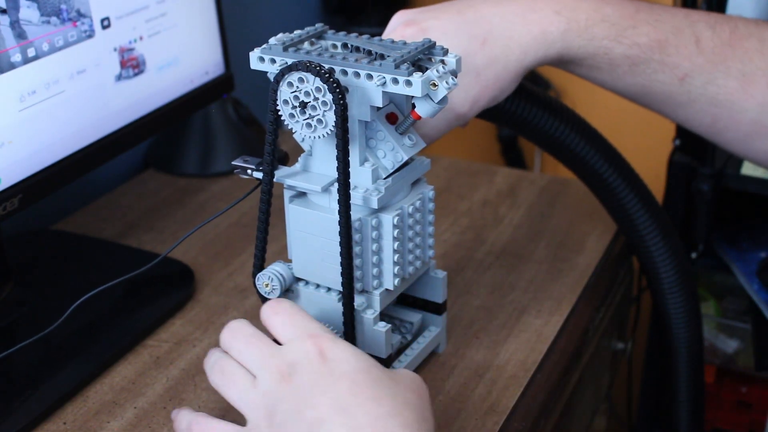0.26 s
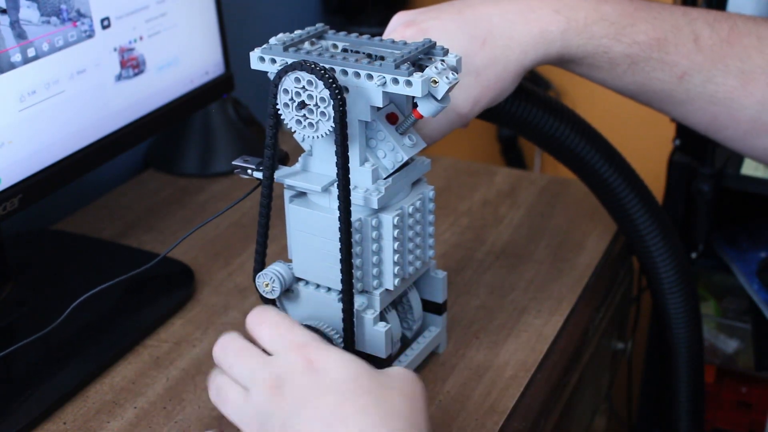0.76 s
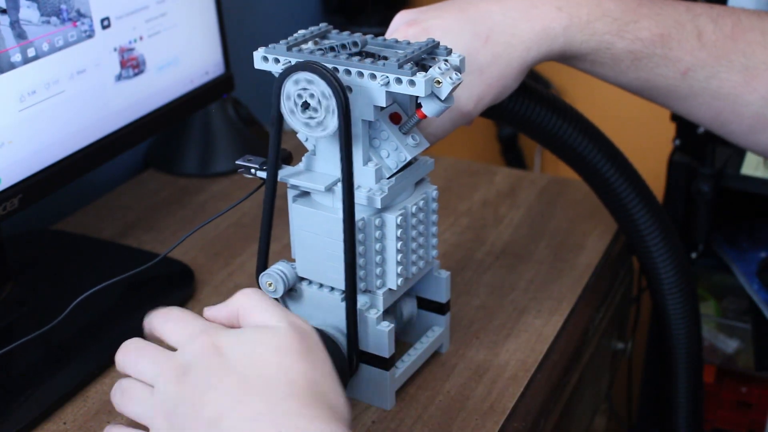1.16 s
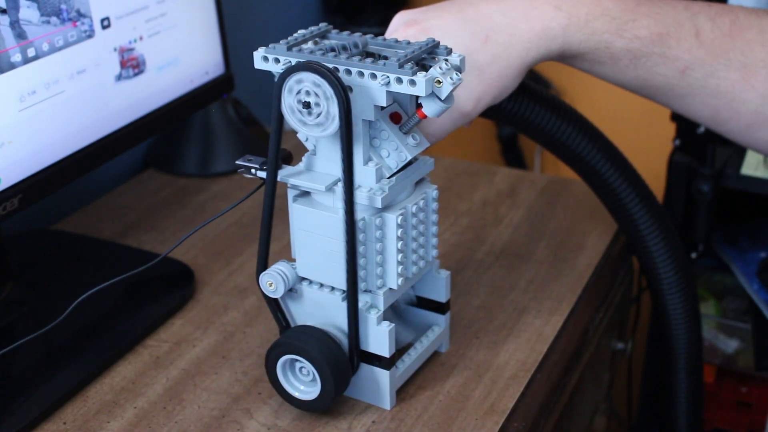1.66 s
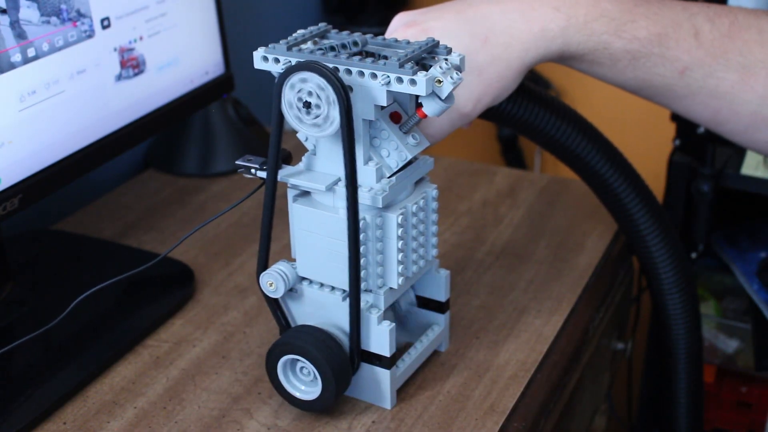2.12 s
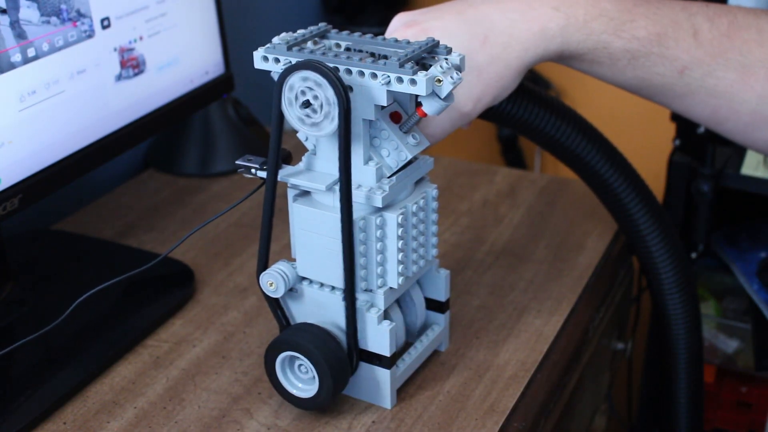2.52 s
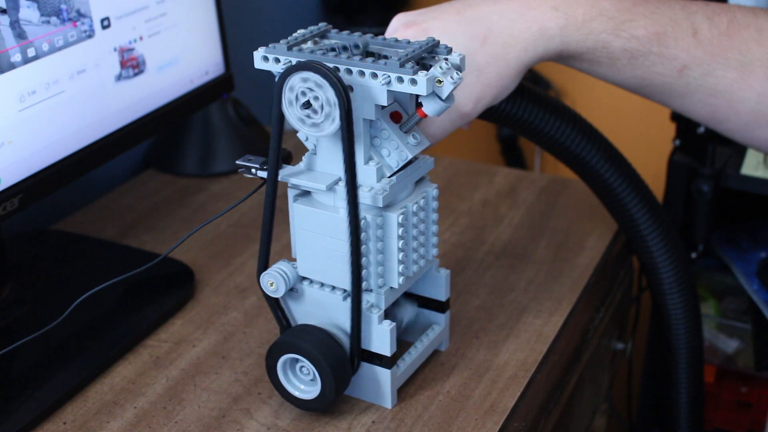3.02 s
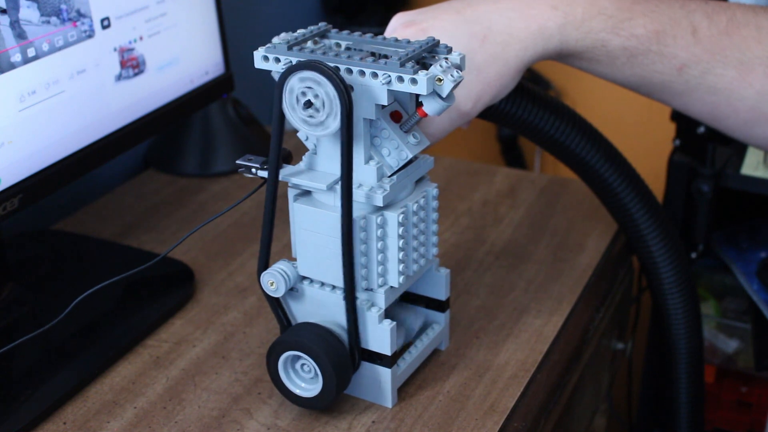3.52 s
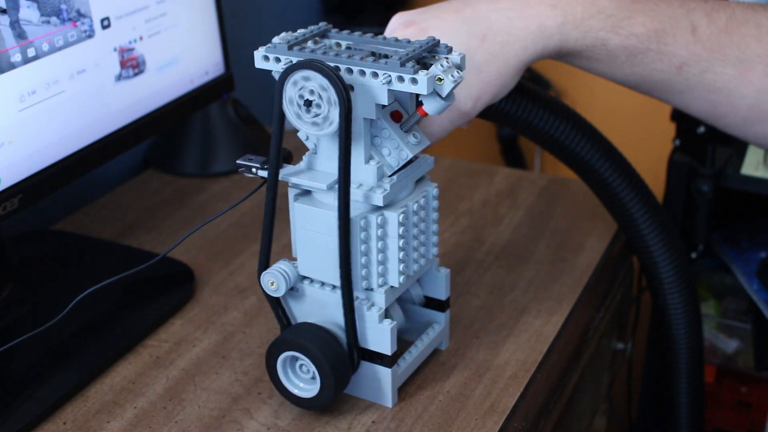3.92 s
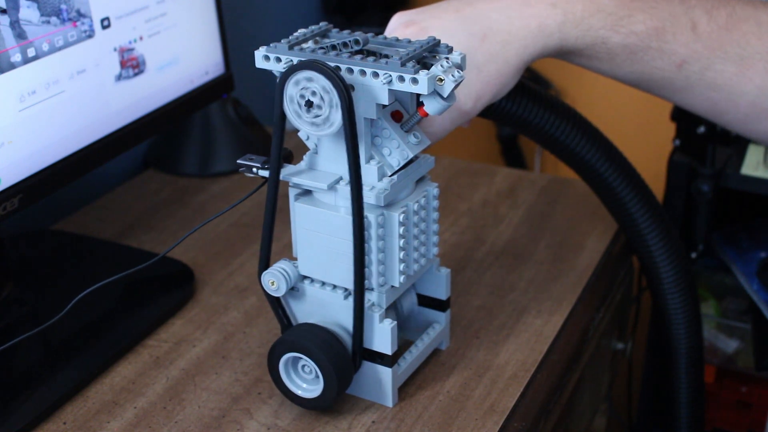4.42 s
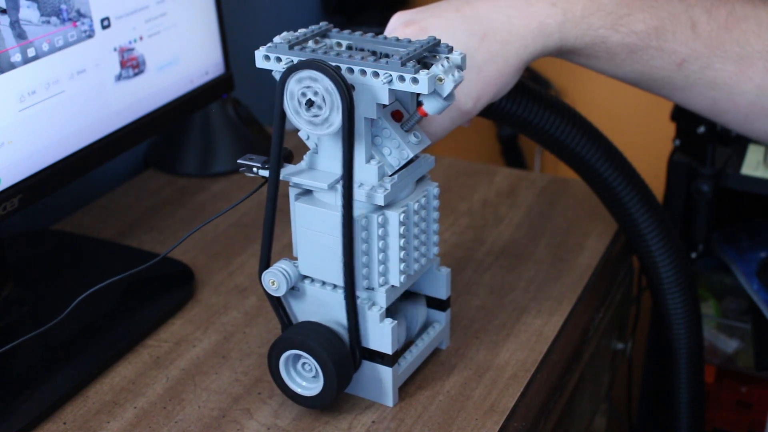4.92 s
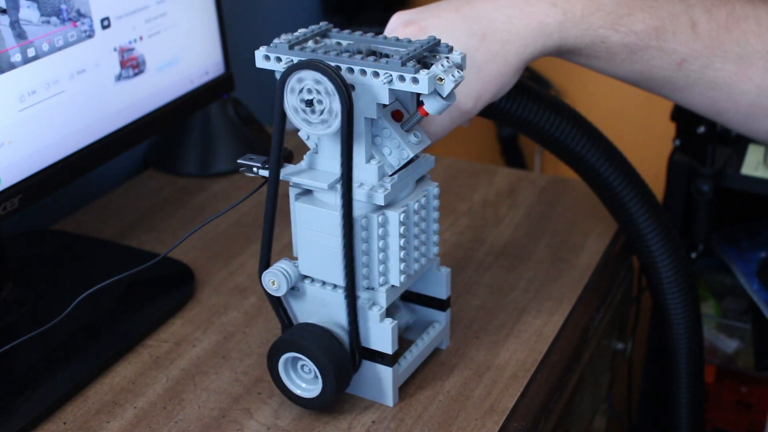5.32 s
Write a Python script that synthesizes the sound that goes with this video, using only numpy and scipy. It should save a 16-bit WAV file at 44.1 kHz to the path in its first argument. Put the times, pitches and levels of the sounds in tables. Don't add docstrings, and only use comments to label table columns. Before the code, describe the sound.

Close to a camera microphone at a desk in a small room, a vacuum cleaner's motor settles into a whine under bright leaking hiss. After about a second a plastic suction engine starts chuffing over six times a second, each whistling puff cut off by a dull pop and a tiny tick.

```python
import sys
import numpy as np
from scipy import signal
from scipy.fft import rfft, irfft
from scipy.io import wavfile
from scipy.ndimage import uniform_filter1d

SR = 44100
rng = np.random.default_rng(int(sys.argv[2]) if len(sys.argv) > 2 else 0)


def master(y):
    cut = np.clip(np.atleast_2d(y).T, -1, 1)
    pcm = np.round(cut * 32767)
    wavfile.write(sys.argv[1], SR, pcm.astype(np.int16))


def amplitude_ratio(level_db):
    exponent = np.asarray(level_db, float) / 20
    return 10 ** exponent


N = 245637

# (shutting time [s], rush level [dB], whistle level [dB])
STROKES = [(1.053, -31, -31), (1.2235, -31, -30), (1.3877, -31.5, -32.5), (1.5474, -30, -29),
           (1.7078, -32.5, -31), (1.8638, -29.5, -29), (2.022, -29.5, -29), (2.1796, -30.5, -29),
           (2.3337, -31.5, -27.5), (2.4895, -32, -28), (2.6428, -31, -27.5), (2.796, -33, -27),
           (2.9475, -31, -28), (3.0998, -32, -27), (3.2524, -32, -29.5), (3.4044, -31.5, -29),
           (3.5598, -32.5, -27), (3.7161, -32.5, -29), (3.8745, -31.5, -29), (4.0266, -31.5, -28.5),
           (4.1806, -32, -28.5), (4.3335, -31, -30), (4.4863, -30.5, -27.5), (4.6408, -32, -30),
           (4.7996, -29.5, -28), (4.9564, -31, -32), (5.1107, -30.5, -31), (5.2639, -30.5, -29.5),
           (5.4167, -32, -29), (5.5697, -33, -29.5)]
# (frequency [Hz], density [dB per Hz])
RUSH_SPECTRUM = [(300, -8), (800, -13.5), (1400, -6.5), (2200, -4), (3000, -4.5), (3900, 1), (5400, -16.5),
                 (6700, -3), (7600, -10.5), (9500, 5.5), (11000, 3), (12300, -4), (13300, -31),
                 (15700, -34)]
# (share of stroke [0-1], frequency [Hz], level [dB])
WHISTLE = [(0, 8250, -4), (.15, 8330, 0), (.45, 8370, 0), (.7, 8390, -2.5), (1, 8600, -8)]
# (delay [s], level [dB])
ECHOES = [
    (.0037, -22.5),
    (.0077, -11.5),
    (0.011, -17),
    (0.0167, -24),
    (.022, -20),
    (.029, -28),
]
# (frequency [Hz], level [dB], t60 [s])
ROOM_MODES = [
    (43, -48.5, 0.15),
    (113, -42, 0.092),
    (397.5, -37.5, 0.086),
]
# (time [s], level [dB], frequency [Hz])
HARD_BOUNCES = [
    (4.034, -29, 1090),
    (4.494, -31, 1216),
]
# (time [s], level [dB])
LEAK_LEVEL = [(0, -30), (.2, -28.5), (.5, -28), (.95, -29.5), (1.3, -29), (2, -30.5), (3, -31.5),
              (4.2, -31), (5.57, -30.5)]
# (frequency [Hz], density [dB per Hz])
LEAK_SPECTRUM = [(300, -17.5), (450, -23), (900, -14.5), (1700, -15.5), (2700, -14), (3750, -4), (4400, -9),
                 (5100, -16), (5900, -13), (6700, -5.5), (7300, -5), (10800, 1), (12200, -6.5),
                 (13200, -26)]
# (time [s], shaft frequency [Hz], shaft level [dB], six-blade fan tone level [dB])
MOTOR = [(0, 289, -49.5, -65), (.1, 293.5, -45, -53.5), (.28, 297.2, -42, -50.5), (.46, 301.6, -42, -49),
         (.65, 301.5, -43, -46), (.75, 303, -44, -56), (.88, 303, -45, -47.5), (1.17, 305, -44.5, -47.5),
         (1.4, 304.8, -45, -59), (1.85, 304, -46, -61), (2.25, 305, -46.5, -51.5), (2.5, 306, -47, -50.5),
         (3, 305.6, -48.5, -50), (4, 306.8, -47.5, -49), (4.5, 306, -48.5, -50), (5, 306.6, -47.5, -49),
         (5.57, 306, -45.5, -49.5)]
# (frequency [Hz], density [dB per Hz])
RUMBLE_SPECTRUM = [(15, -10), (40, -11), (80, -15), (120, -0.5), (160, -7.5), (230, 0.5), (420, -11),
                   (600, -16), (1000, -28)]
# (frequency [Hz], density [dB per Hz])
EXHAUST_SPECTRUM = [(3000, -22), (8000, 0), (12500, -8), (14500, 3), (16000, -3)]
SPREADS = [.285, .355, .936, 1.446, 1.609, 1.795, 3.42, 3.629, 3.768, 4.558, 4.767]

FIRST_TURN_S, OPEN_SHARE = .178, .36
RUSH_BODY_DB, SEAL_DB, BODY_DB_PER_LEAK_DB = -0.36, -30.5, 1.3
WHISTLE_WIDTH_HZ = 207
POP_DB, POP_SCATTER_DB = -31.5, 0.8
DRAW_DB, DRAW_LEAD_S, DRAW_HZ = -19, .014, 70
FLAP_S, FLAP_DB, FLAP_SCATTER_DB, FLAP_HZ = .009, -39, 3, 1250
LEAK_BODY_DB = 1.73
FOURTH_UNDER_SHAFT_DB, FOURTH_RUNNING_DB = -16, -2
SPIN_UP_DB, SPIN_UP_S = 7, .3
TWELFTH_DB, TWELFTH_RUNNING_DB, TWELFTH_DRIFT_DB = -46.5, -4.5, 3
BLADE_WOBBLE_RAD = .035
RUMBLE_DB, EXHAUST_DB = -56, -48.5
SPREAD_LOW_HZ, SPREAD_HIGH_HZ, SPREAD_RATIO = 4300, 13000, 1.24


def columns(table, at):
    first, *rest = np.transpose(table)
    return [np.interp(at, first, c) for c in rest]


def coloured(spectrum):
    hz, db = np.transpose(spectrum)
    bins_hz = np.maximum(np.arange(N // 2 + 1) * SR / N, 1)
    shape_db = np.interp(np.log(bins_hz), np.log(hz), db, left=-60, right=-60)
    x = irfft(rfft(rng.standard_normal(N)) * amplitude_ratio(shape_db), N)
    return x / np.std(x)


def walk(rate_hz):
    hold = int(SR / rate_hz)
    steps = np.repeat(rng.standard_normal(N // hold + 1), hold)
    return 1.1 * uniform_filter1d(uniform_filter1d(steps, hold), hold)[:N]


def filt(x, hz, kind, order=2):
    return signal.sosfilt(signal.butter(order, hz, kind, fs=SR, output="sos"), x)


def decay(x, t60_s, hz=0):
    return signal.lfilter([1], [1, -np.exp(2j * np.pi * hz / SR - np.log(1000) / (t60_s * SR))], x)


def ring(x, hz, t60_s):
    return decay(x, t60_s, hz).imag


def strokes():
    shuts = np.transpose(STROKES)[0]
    turn_s = np.diff(shuts, prepend=shuts[0] - FIRST_TURN_S)
    return shuts - OPEN_SHARE * turn_s, shuts


def valve(t, rise_s=.014, fall_s=.005):
    opens, shuts = strokes()
    k = np.clip(np.searchsorted(shuts, t - .02), 0, len(shuts) - 1)
    opening = np.clip((t - opens[k]) / rise_s + .5, 0, 1)
    gap = opening * np.clip((shuts[k] - t) / fall_s, 0, 1)
    share = (t - opens[k]) / (shuts[k] - opens[k])
    last = np.searchsorted(shuts, t + .003) - 1
    since = np.where(last < 0, 10, t + 0.00092 - shuts[last])
    return gap, share, k, since


def intake(gap, share, k, steady=0.84):
    shuts, rush_db, whistle_db = np.transpose(STROKES)
    body_db = RUSH_BODY_DB + BODY_DB_PER_LEAK_DB * (columns(LEAK_LEVEL, shuts)[0] - SEAL_DB)
    air = coloured(RUSH_SPECTRUM)
    body = filt(air, 6100, "low")
    level_db = rush_db[k] + 2.5 - 2.86 * share + 1.34 * walk(90)
    rush = amplitude_ratio(level_db) * (air + (amplitude_ratio(body_db[k]) - 1) * body)
    hz, tone_db = columns(WHISTLE, share)
    sway = filt(rng.standard_normal((2, N)), WHISTLE_WIDTH_HZ / 2, "low", order=1)
    sway = sway / np.std(sway)
    phase = 2 * np.pi * np.cumsum(hz * (1 + .003 * walk(8) + 0.00599 * walk(150))) / SR
    tone = (steady + sway[0]) * np.cos(phase) + sway[1] * np.sin(phase)
    return gap * rush + gap ** 2 * amplitude_ratio(whistle_db[k] + 0.5 + tone_db) * tone


def pops(open_db=0, lead_s=0.00274, rattle_db=-16, rattle_t60_s=0.063):
    opens, shuts = strokes()
    push_chance, knock_chance, pop_chance = rng.standard_normal((len(shuts), 3)).T
    pop_db = POP_DB + POP_SCATTER_DB * pop_chance
    shut, push, knock = np.zeros((3, N + SR // 10))
    shut_at = (shuts * SR).astype(int)
    shut[shut_at] = amplitude_ratio(pop_db)
    push[((opens - .005) * SR).astype(int)] = amplitude_ratio(pop_db + open_db + 1.4 * push_chance)
    knock[shut_at] = amplitude_ratio(pop_db + rattle_db + 0.96 * knock_chance)
    s = np.arange(-400, 401) / SR
    snap = np.where(s < -.0003, np.exp((s + .0003) / .0011), -1.15 * np.exp(-(s + .0003) / .001))
    direct = filt(np.convolve(shut, amplitude_ratio(1.0) * snap, "same"), 980, "low")
    out = direct + sum(amplitude_ratio(db) * np.roll(direct, int(lag_s * SR)) for lag_s, db in ECHOES)
    drive = filt(push, 87, "low") - np.roll(shut, -int(lead_s * SR))
    out = out + sum(amplitude_ratio(db + 24) * ring(drive, hz, t60_s) for hz, db, t60_s in ROOM_MODES)
    draw = np.roll(filt(push, DRAW_HZ, "low"), -int(DRAW_LEAD_S * SR))
    out = out - amplitude_ratio(DRAW_DB + 40) * draw
    shake = decay(knock, rattle_t60_s).real[:N]
    return out[:N] + shake * coloured([(80, -19), (200, -15), (420, -9), (800, -6.5), (2000, -25)])


def flap_bounces():
    ticks = list(HARD_BOUNCES)
    for shut_s in strokes()[1]:
        a, b = rng.standard_normal(2)
        ticks.append((shut_s + FLAP_S, FLAP_DB + FLAP_SCATTER_DB * a, FLAP_HZ * (1 + 0.083 * b)))
    out = np.zeros(N)
    for at_s, db, hz in ticks:
        hit = 1. * (np.arange(N) == int(at_s * SR))
        out += amplitude_ratio(db) * ring(hit, hz, 0.017)
    return out


def leak(t, since, dip_db=-3.5, refill_s=.025):
    db, = columns(LEAK_LEVEL, t)
    hiss = coloured(LEAK_SPECTRUM)
    body = filt(hiss, 3150, "low")
    body_db = LEAK_BODY_DB - 0.54 * (since < 1)
    sag_db = dip_db * np.exp(-since / refill_s) * np.clip(since / .008, 0, 1)
    level_db = db + sag_db + 0.1 * walk(3.61) + 0.69 * walk(60)
    return amplitude_ratio(level_db) * (hiss + (amplitude_ratio(body_db) - 1) * body)


def motor(t, gap):
    hz, shaft_db, sixth_db = columns(MOTOR, t)
    turn = 2 * np.pi * np.cumsum(hz) / SR + 0.049 * walk(25.07)
    load = filt(gap, 5.8, "low", order=1)
    opens, _ = strokes()
    running = np.clip((t - opens[0]) / .1, .2, 1)
    unsteady_db = running * (.9 * walk(9) + 1.1 * walk(28))
    shaft = amplitude_ratio(shaft_db + .9 - 3.2 * load + unsteady_db) * np.sin(turn)
    fourth_db = shaft_db + FOURTH_UNDER_SHAFT_DB + FOURTH_RUNNING_DB * running
    fourth_db = fourth_db + SPIN_UP_DB * np.exp(-t / SPIN_UP_S) + 1.6 * walk(6)
    twelfth_db = TWELFTH_DB + TWELFTH_RUNNING_DB * running + TWELFTH_DRIFT_DB * walk(4)
    blades = 0
    for order, db, flutter_db in ((4, fourth_db, 3), (6, sixth_db, 1.2), (12, twelfth_db, 1.5)):
        level = amplitude_ratio(db - 2.0 * load + flutter_db * walk(40))
        wobble = BLADE_WOBBLE_RAD * order / 12 * walk(70)
        blades = blades + level * np.sin(order * (turn + wobble))
    return np.sqrt(2) * (shaft + blades)


def rumble_and_exhaust(t, gap):
    crank_db = np.interp(t, [.9, 1.05], [-4.5, -2.5])
    desk_db = RUMBLE_DB + crank_db + 4 * gap + 1.6 * walk(8.3)
    return amplitude_ratio(desk_db) * coloured(RUMBLE_SPECTRUM) + amplitude_ratio(EXHAUST_DB) * coloured(EXHAUST_SPECTRUM)


def scene():
    t = np.arange(N) / SR
    gap, share, k, since = valve(t)
    engine = intake(gap, share, k) + pops() + flap_bounces()
    cleaner = leak(t, since) + motor(t, gap) + rumble_and_exhaust(t, gap)
    mono = engine + cleaner
    return np.array([mono, mono])


def gain_control(x, slope=0.27, hold_s=0.024, aim_db=-28):
    keep = np.exp(-1 / (hold_s * SR))
    aim = amplitude_ratio(2 * aim_db)
    power = signal.lfilter([1 - keep], [1, -keep], x ** 2, zi=[aim])[0]
    return x * (power / aim) ** (-slope / 2)


def stereo_spreads(mid):
    side, size = np.zeros(N), 2048
    hz = np.arange(size // 2 + 1) * SR / size
    window = np.clip(3 * np.hanning(size) - 1, 0, 1)
    for at_s in SPREADS:
        place = (rng.random() + np.arange(2)[:, None]) / 2
        low_hz = SPREAD_LOW_HZ * (SPREAD_HIGH_HZ / SPREAD_LOW_HZ) ** place
        in_band = ((hz > low_hz) & (hz < low_hz * SPREAD_RATIO)).any(axis=0)
        scramble = np.exp(2j * np.pi * rng.random(len(hz))) * in_band
        at = slice(int(at_s * SR) - size // 2, int(at_s * SR) + size // 2)
        side[at] += amplitude_ratio(-4.0) * window * irfft(np.abs(rfft(mid[at])) * scramble)
    return side


def top_cut(x):
    return signal.sosfilt(signal.butter(12, 15720, fs=SR, output="sos"), x)


def record(dry):
    mid = gain_control(filt(dry[0], 24, "high", order=1))
    side = stereo_spreads(mid)
    return top_cut(np.array([mid + side, mid - side]))


dry = scene()
out = record(dry)
master(out)
```